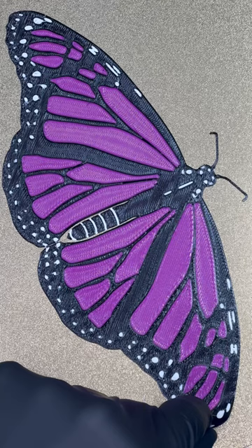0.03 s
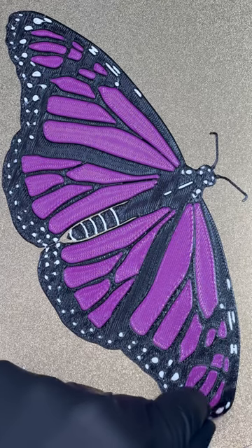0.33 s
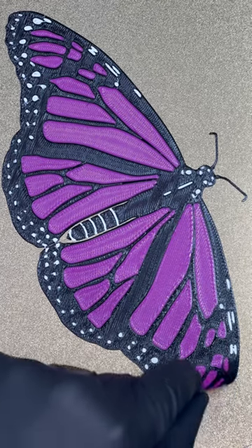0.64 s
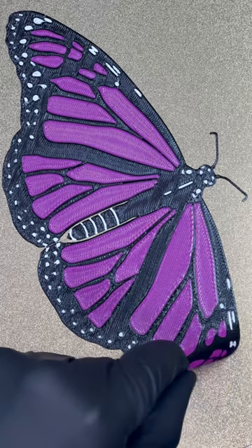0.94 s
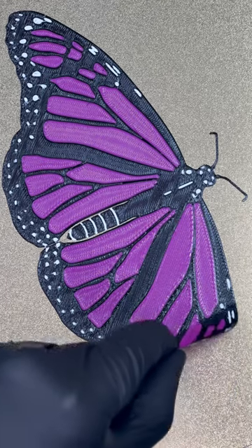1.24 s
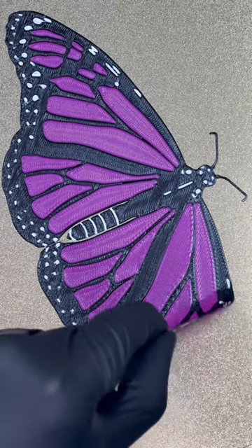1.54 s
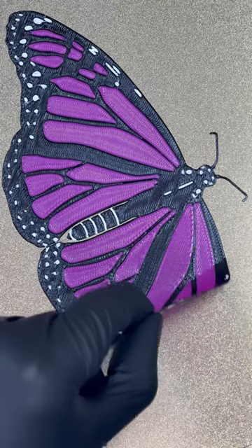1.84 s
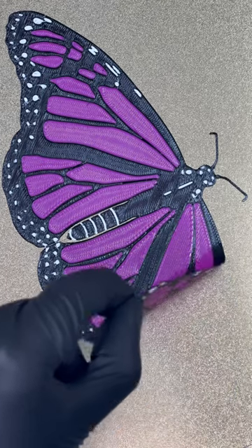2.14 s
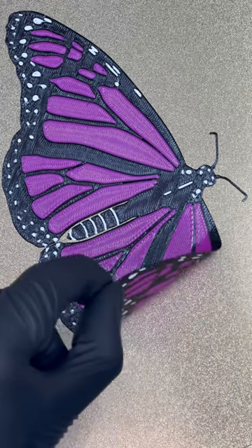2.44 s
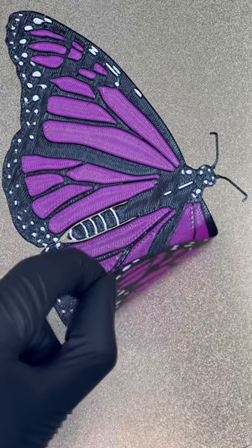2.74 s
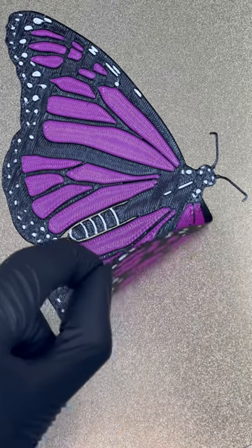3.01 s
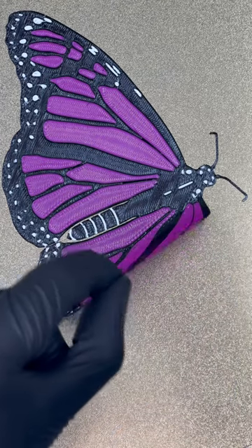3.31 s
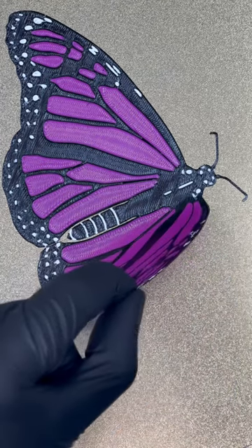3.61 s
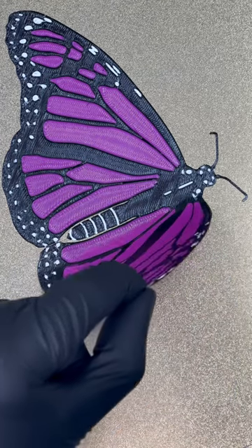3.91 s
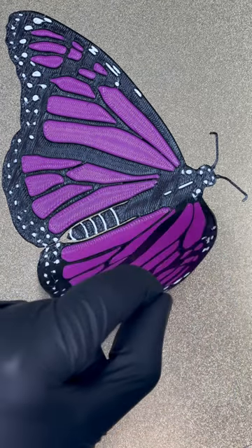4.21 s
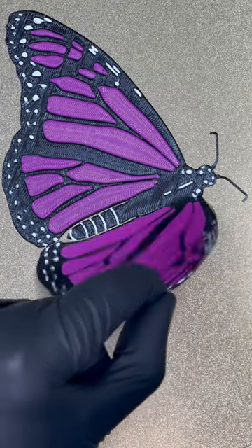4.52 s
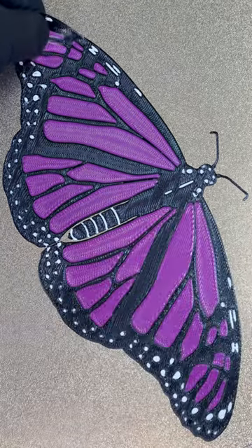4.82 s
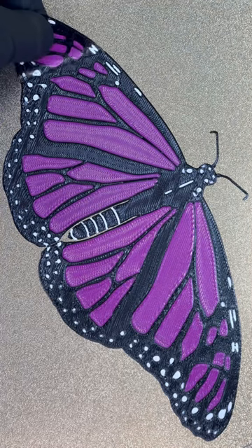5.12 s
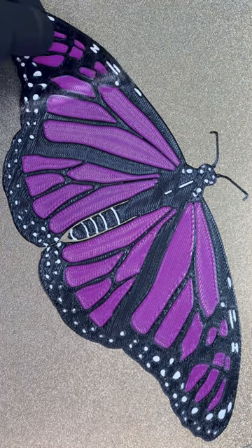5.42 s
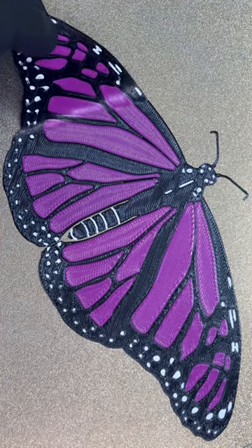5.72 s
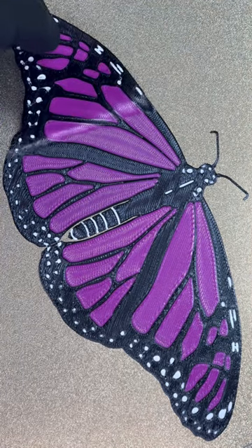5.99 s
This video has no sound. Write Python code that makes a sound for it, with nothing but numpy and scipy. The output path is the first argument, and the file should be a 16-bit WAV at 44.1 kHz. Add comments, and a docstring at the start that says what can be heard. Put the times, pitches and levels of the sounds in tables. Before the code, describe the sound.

Close, crisp crackles and snaps of a thin plastic sheet being peeled from a plate, interrupted by one sharp slap.

```python
"""A faint crackle rises out of a small room's low rumble: a thin plastic print is being peeled off a
textured build plate, close by. The bond fails in avalanches of tiny cracks and single sharp snaps,
with a few dull thumps as the plate gives, and the freed flap rings lower as it grows.
At about 4.5 s the first wing is let go and slaps back on the plate; then a second wing is peeled."""
import sys
import numpy as np
from scipy import signal
from scipy.fft import rfft, irfft, next_fast_len
from scipy.io import wavfile
from scipy.ndimage import uniform_filter1d

SR = 44100
rng = np.random.default_rng(int(sys.argv[2]) if len(sys.argv) > 2 else 0)


def to_wav(s):
    """Save 16-bit WAV."""
    ch = np.atleast_2d(s).T  # columns
    pcm = np.round(np.clip(ch, -1, 1) * 32767)  # PCM
    wavfile.write(sys.argv[1], SR, pcm.astype(np.int16))


N = 271215
TIME = np.arange(N) / SR


def amp(db):
    return 10 ** (np.asarray(db) / 20)


def unit_rms(x):
    return x / np.sqrt(np.mean(x ** 2) + 1e-20)


def curves(rows):
    """Turns each column after the time column into an automation curve, one value per sample."""
    times, *columns = np.transpose(rows)
    return [np.interp(TIME, times, column) for column in columns]


def value_at(points, hz):
    """Reads a curve at hz, on a log-frequency axis."""
    freqs, values = np.transpose(points)
    return np.interp(np.log(hz + 1), np.log(freqs + 1), values)


def add(mix, start_s, sound):
    part = mix[round(start_s * SR):][:len(sound)]
    part += sound[:len(part)]


def coloured(x, eq, size=2048):
    """Unit-energy EQ, causal so that attacks stay sharp."""
    log_gain = np.log(amp(value_at(eq, abs(np.fft.fftfreq(size, 1 / SR)))))
    taps = np.fft.ifft(np.exp(signal.hilbert(log_gain).conj())).real[:size // 2]
    return signal.fftconvolve(x, taps / np.linalg.norm(taps))[:len(x)]


def tinted(x, body_db, treble_db, body_hz=2350, treble_hz=10700):
    """Levels three bands to equal rms, then sets body and treble against the mids."""
    size = next_fast_len(len(x))
    hz, spectrum = np.fft.rfftfreq(size, 1 / SR), rfft(x, size)
    low = 1 / (1 + (hz / body_hz) ** 8)
    high = 1 - 1 / (1 + (hz / treble_hz) ** 12)
    bands = (low, 1 - low - high, high)
    body, mids, treble = (unit_rms(irfft(spectrum * band, size)[:len(x)]) for band in bands)
    return mids + amp(body_db) * body + amp(treble_db) * treble


# Colour of the room's rumble: freq_hz, gain_db
RUMBLE_EQ = [(20, -4.5), (45, 1), (70, 5), (110, 0), (200, -6), (400, -15.5), (1000, -23.5), (3000, -37.5),
             (9000, -47.5), (16000, -46)]
# Mains hum partials: pitch_hz, level_db
HUM_PARTIALS = [(60, -63), (120, -70.5), (180, -77.5)]


def room_tone(rumble_db=-62):
    """A steady bed of low rumble and mains hum."""
    hum = sum(amp(db) * np.sqrt(2) * np.sin(2 * np.pi * (hz * TIME + rng.random()))
              for hz, db in HUM_PARTIALS)
    rumble = unit_rms(coloured(rng.standard_normal(N), RUMBLE_EQ, size=8192))
    return hum + amp(rumble_db) * rumble


# The pull on each wing, riding the crackle: time_s, level_db, slips_per_s
FIRST_WING_PULL = [(.03, -67.5, 41), (.27, -54, 86), (.3, -35, 600), (.47, -42.5, 840), (.65, -35, 1200),
                   (.92, -39.5, 1180), (1.4, -30.5, 670), (1.82, -26, 930), (2.16, -43, 540),
                   (2.45, -31.5, 600), (2.7, -30.5, 1000), (3.04, -21, 1130), (3.25, -43.5, 170),
                   (3.55, -23.5, 445), (3.73, -45.5, 107), (3.98, -29.5, 188), (4.17, -35, 223),
                   (4.29, -65, 180), (4.46, -24, 155)]
SECOND_WING_PULL = [(4.612, -50.5, 130), (4.81, -62, 150), (4.882, -37.5, 297), (5.1, -36, 570),
                    (5.299, -30.5, 1030), (5.5, -36, 550), (5.91, -32.5, 1200), (5.98, -42, 560),
                    (6.141, -60.5, 73)]


def pull():
    """How loud and how busy the peel is, through both wings."""
    return curves(FIRST_WING_PULL + SECOND_WING_PULL)


def fracture(scatter_s, scatter_db, tail_s, tail_db, size=1024):
    """One crack of unit energy: a sharp click, waves scattered in the sheet, and a longer tail."""
    t = np.arange(size) / SR
    scatter, tail = rng.standard_normal((2, size)) * np.exp(-t / np.array([[scatter_s], [tail_s]]))
    wave = amp(scatter_db) * scatter / np.linalg.norm(scatter)
    wave += amp(tail_db) * tail / np.linalg.norm(tail)
    wave[0] += 1
    return wave / np.linalg.norm(wave)


def avalanches(cracks_per_s=4400, burst_s=.0013, creep=.14, first_crack=2.7):
    """Each slip of the peel line sets off a short burst of tiny cracks of very unequal size."""
    def impulses(per_s, spread_db):
        return (rng.random(N) < per_s / SR) * amp(spread_db * np.minimum(rng.exponential(1, N), 3))

    _, slips_per_s = pull()
    slips = impulses(slips_per_s, spread_db=5)
    activity = creep + signal.lfilter([1], [1, -np.exp(-1 / (burst_s * SR))], slips)
    cracks = impulses(cracks_per_s, spread_db=4)
    clicks = (activity * cracks + first_crack * slips) * rng.choice([-1, 1], N)
    # each spot on the peel line sounds its own way
    spots = [fracture(scatter_s=.0003, scatter_db=-4, tail_s=.0025, tail_db=-12) for _ in range(16)]
    spot = rng.integers(0, len(spots), N)
    return sum(signal.oaconvolve(clicks * (spot == k), wave)[:N] for k, wave in enumerate(spots))


def resonate(x, hz, width_hz):
    """A unity-gain resonance, steady or gliding along the curve hz."""
    r = np.exp(-np.pi * width_hz / SR)
    if np.ndim(hz) == 0:
        return 2 * signal.lfilter([1 - r], [1, -r * np.exp(2j * np.pi * hz / SR)], x + 1e-18).real
    turn = np.exp(2j * np.pi * np.cumsum(hz) / SR)
    return 2 * (turn * signal.lfilter([1 - r], [1, -r], x * turn.conj() + 1e-18)).real


# The flap's bending modes: pitch_ratio, width_hz, gain_db
FLAP_MODES = [(1, 75, 11), (2.08, 110, 7), (3.5, 200, 2), (5.6, 320, -3)]
# Each wing's flap as it comes free: time_s, bend_hz, ring_hz, strip_gain_db, low_ring_gain_db
FIRST_WING_FLAP = [(.28, 5070, 7360, -37, 8.5), (.6, 1530, 7600, -8.5, 9.5), (.8, 1030, 6940, -17, 16.5),
                   (1.2, 607, 7000, 2.5, 13), (1.6, 443, 6400, -1, -30), (2, 340, 5030, -2.5, 0.5),
                   (2.6, 300, 5220, -1, -10), (3.05, 264, 4300, -16.5, -20.5), (3.6, 217, 3760, -1.5, -7.5),
                   (4.44, 220, 3720, 5, -21.5)]
SECOND_WING_FLAP = [(4.521, 3550, 6200, -11, -13.5), (4.83, 3320, 5800, -17, -18),
                    (4.97, 1916, 4800, 4, -23), (5.17, 1747, 4700, 3.5, -32),
                    (5.33, 1355, 4650, 9.5, -17.5), (5.55, 775, 4370, 1.5, -9),
                    (5.72, 750, 6000, -6.5, -12), (6.1, 638, 5380, -3, 3)]


def flap(x, ring_db=3.5, upper_db=3.5, bending_db=4, tip_hz=7250):
    """The freed plastic rings at pitches that sink as more of it comes loose."""
    rows = FIRST_WING_FLAP + SECOND_WING_FLAP
    _, ring_hz, strip_db, low_db = curves(rows)
    bend_hz = 1 / curves([(s, 1 / hz) for s, hz, *_ in rows])[0]  # the period grows with freed length
    upper_hz = 9750 * (bend_hz / 1000) ** .25  # the bent strip's upper ring sinks with the bending mode
    strip = amp(ring_db) * resonate(x, ring_hz, width_hz=480)
    strip += amp(upper_db) * resonate(x, upper_hz, width_hz=650)
    low_ring = amp(low_db) * resonate(x, .48 * ring_hz, width_hz=380)
    bending = sum(amp(db) * resonate(x, np.minimum(ratio * bend_hz, SR / 2), width_hz)
                  for ratio, width_hz, db in FLAP_MODES)
    bending /= np.hypot(1, .75 * bend_hz / 1000)  # the fingers damp a short flap
    second_wing = TIME > SECOND_WING_FLAP[0][0]
    tip = resonate(x * second_wing, tip_hz, width_hz=500)  # its tip has a steady ring of its own
    return x + amp(strip_db) * strip + low_ring + tip + amp(bending_db) * bending


# The build plate's resonances: pitch_hz, width_hz, gain_db
PLATE_RINGS = [(380, 20, 1), (890, 39, 0), (1270, 41, -13), (1942, 66, 4.5), (2950, 300, -6)]


def plate(x, free_at_s=1.86):
    """The plate rings at steady pitches, damped by the print until enough has come off."""
    bared = np.clip(TIME / free_at_s, 0, 1) ** 2
    return x + sum(amp(db) * resonate(bared * x, hz, width_hz) for hz, width_hz, db in PLATE_RINGS)


# The peel line sticks and the crackle ducks: start_s, length_s
STALL_CUES = [(1.9, 0.043), (2.075, 0.012), (2.188, 0.028), (2.31, 0.025), (2.406, 0.022), (3.278, 0.014),
              (3.392, .031), (3.691, 0.026), (4.182, 0.027), (4.981, 0.019)]
# A stretch of the bond tears in one go: start_s, length_s, level_db
SURGE_CUES = [(1.156, 0.012, -25), (2.092, 0.035, -28), (2.216, 0.015, -28), (2.269, 0.014, -30),
              (2.346, 0.019, -27.5), (3.32, 0.053, -24.5), (3.537, 0.016, -28), (3.869, 0.016, -23.5),
              (4.487, 0.046, -23.5), (5.159, 0.036, -27.5)]


def stick_and_slip(stall_db=-12.5, run_on_db=-18.5, run_on_decay_s=.0081, fade_s=.0059):
    """The crackle's envelope: the pull, with stalls, surges and a brief run-on after each cued snap."""
    stuck, freed = np.zeros((2, N))
    t = np.arange(SR // 8) / SR
    attack = np.minimum(t / fade_s, 1)
    for start_s, length_s in STALL_CUES:
        add(stuck, start_s, attack * (t < length_s))
    for start_s, db, *_ in SNAP_CUES:
        add(freed, start_s, amp(db + run_on_db) * np.exp(-t / run_on_decay_s))
    for start_s, length_s, db in SURGE_CUES:
        release = np.exp(-np.maximum(t - length_s, 0) / fade_s)
        add(freed, start_s, amp(db) * attack * release)
    pull_db, _ = pull()
    return amp(stall_db * stuck) * np.hypot(amp(pull_db), freed)


# Colour of the tiny cracks: freq_hz, gain_db
CRACK_EQ = [(40, -14), (150, -19.5), (500, -20.5), (1200, -16.5), (2200, -13), (3200, -11), (4500, -5),
            (6500, 0.5), (9500, -2.5), (12000, -12), (16000, -13)]
# Each wing's tone against the mids, before trims: time_s, body_db, treble_db
FIRST_WING_TONE = [(.1, -23, 3.5), (.35, -13, 6), (.8, -13, 10), (1.6, -23.5, 3.5), (2.4, -22.5, 1.5),
                   (3.1, -30.5, 1.5), (4.1, -27.5, 0.5), (4.42, -26.5, 0)]
SECOND_WING_TONE = [(4.52, -24, 3.5), (4.9, -24.5, -1.5), (5.12, -14, -2.5), (5.6, -20, -10.5),
                    (5.9, -24, -6), (6.099, -33, -11)]


def crackle(trim_db=-.76, body_trim_db=1, treble_trim_db=2, grip_depth_db=3.5, grip_s=.011):
    """The failing bond crackles through flap and plate; its grip is uneven from spot to spot."""
    body_db, treble_db = curves(FIRST_WING_TONE + SECOND_WING_TONE)
    grip = uniform_filter1d(rng.standard_normal(N), round(grip_s * SR))
    grip = unit_rms(uniform_filter1d(grip, size=400))
    ringing = plate(flap(coloured(avalanches(), CRACK_EQ)))
    sound = tinted(ringing, body_db + body_trim_db, treble_db + treble_trim_db)
    power = uniform_filter1d(uniform_filter1d(sound ** 2, size=900), size=900)
    levelled = sound / np.sqrt(abs(power) + 1e-6)  # a steady pull frees energy at a steady rate
    return amp(trim_db + grip_depth_db * np.tanh(grip)) * stick_and_slip() * levelled


# Larger patches letting go, before trims, tone against the mids: start_s, level_db, body_db, treble_db
SNAP_CUES = [(0.2258, -16.5, -21.5, -2.5), (0.2835, -7, -20, -14.5), (0.8846, -13.5, -31, -8.5),
             (1.0302, -18, -23, -12), (1.2648, -3, -31, -0.5), (1.3438, -10, -44, -4),
             (1.3936, -14, -33, -24), (1.494, -6, -42, -7.5), (1.6327, -4, -36, -15.5),
             (1.6802, -11, -54, -8), (1.71, -8, -52, -13), (1.7486, -2.5, -54, -10.5),
             (1.9451, -0.5, -41, -20), (1.9935, -6, -42, -10), (2.0375, -6, -39, -8.5),
             (2.2188, -4, -47, -22), (2.3506, -8.5, -36, -19), (2.4869, -8, -29.5, -10.5),
             (2.643, -5, -40, -43), (2.6866, -2, -50, -8), (2.7302, -5, -47, -2), (2.7731, -3.5, -45, -20),
             (3.051, -4, -49, -17), (3.0747, 5.5, -34, -9), (3.1872, -9, -57, -16),
             (3.3039, -0.5, -29.5, -11), (3.3192, 6, -48, -11), (3.3453, -2.5, -34.5, -32),
             (3.3549, -1, -58, -23), (3.3892, -13, -46, -4), (3.4257, -1.5, -39.5, -15.5),
             (3.4625, -2, -23.5, -3), (3.508, -0.5, -49.5, -8), (3.5582, 1.5, -33, -5),
             (3.717, -17, -49, -15), (3.7277, -14, -46, -21), (3.7448, -2, -43, -37),
             (3.8563, 1, -37.5, -30.5), (3.8838, -6.5, -31, -14), (4.0022, -14, -56, -26),
             (4.0798, -7.5, -53, -31), (4.117, -7, -52, -8), (4.1595, -0.5, -57, -5.5),
             (4.2042, -15, -36.5, -17), (4.339, -21, -50, -6), (4.423, -7, -44, -40), (4.555, -7.5, -42, 6),
             (4.6672, -22, -41.5, -35), (4.7117, -23.5, -40, -32), (4.782, -26, -41, -33),
             (4.8489, -21, -51, -36), (4.9656, -20.5, -48, -17), (5.1307, -26, -31, -23),
             (5.2174, -4, -42, 6), (5.5136, -9, -41, -41), (5.672, -7.5, -30.5, -11),
             (5.7597, -13, -31.5, -29), (5.9065, -14, -32, -36), (6.0182, -17, -30.5, -34.5)]
# Colour of a snap: freq_hz, gain_db
SNAP_EQ = [(40, -19), (200, -32.5), (700, -32.5), (1800, -28), (3000, -12), (4500, -4), (7500, 6.5),
           (10500, 5), (16000, -3.5)]


def snaps(trim_db=3.5, body_trim_db=12, treble_trim_db=14):
    """Single sharp cracks, each with its own colour, rung through flap and plate."""
    out = np.zeros(N)
    for start_s, db, body_db, treble_db in list(SNAP_CUES) + small_snap_cues():
        crack = coloured(fracture(scatter_s=.00071, scatter_db=0, tail_s=.0017, tail_db=-2), SNAP_EQ)
        sound = tinted(np.pad(crack, 32), body_db + body_trim_db, treble_db + treble_trim_db)
        add(out, start_s, amp(db + trim_db) * sound / np.linalg.norm(sound))
    return plate(flap(out, ring_db=10, upper_db=-19.5))


def small_snap_cues(count=64, trim_db=4, follow=.52, spread_db=2, body_trim_db=-13, treble_trim_db=-14):
    """Lesser patches let go at chance moments, louder under a harder pull, never during a stall."""
    first_s, last_s = FIRST_WING_PULL[2][0], SECOND_WING_PULL[-2][0]
    pull_db, _ = pull()
    body_db, treble_db = curves(FIRST_WING_TONE + SECOND_WING_TONE)
    jitter, size = rng.random((count, 2)).T
    start_s = first_s + (last_s - first_s) * (np.arange(count) + jitter) / count
    at = (start_s * SR).astype(int)
    level_db = trim_db + follow * pull_db[at] + spread_db * (2 * size - 1)
    cues = zip(start_s, level_db, body_db[at] + body_trim_db, treble_db[at] + treble_trim_db)
    return [cue for cue in cues
            if not any(0 < cue[0] - stall_s < length_s for stall_s, length_s in STALL_CUES)]


# The plate gives as the pull suddenly lets go: start_s, level_db, decay_s
THUMP_CUES = [(0.2814, -40.5, 0.01), (3.066, -48, 0.013), (3.86, -40, 0.02), (4.472, -31, 0.027),
              (5.67, -46, 0.011), (5.757, -47.5, 0.017)]
# Colour of a thump: freq_hz, gain_db
THUMP_EQ = [(25, -14), (55, -3), (110, 0), (185, 0), (270, -11), (500, -24), (2000, -50)]


def thumps():
    """Dull, quickly damped shakes of the plate on the table."""
    out, t = np.zeros(N), np.arange(SR // 4) / SR
    for start_s, db, decay_s in THUMP_CUES:
        shake = rng.standard_normal(len(t)) * np.exp(-t / decay_s)
        add(out, start_s, amp(db) * coloured(shake, THUMP_EQ))
    return out


# The released wing landing piece by piece: start_s, gain_db, decay_s
SLAP_CUES = [(4.4639, 0, .001), (4.4676, -4, .0011), (4.4687, -3, .0015), (4.4727, -8, .001),
             (4.474, -3, .0013), (4.4854, -7, .0008)]
# Colours of the bright smack and of the thud under it: freq_hz, gain_db
SMACK_EQ = [(40, -33), (150, -54), (350, 2), (600, -16), (1300, -14), (2500, -0.5), (5500, 4), (10500, 6.5),
            (16000, -10.5)]
THUD_EQ = [(30, -26), (80, -19), (175, -3.5), (250, -9), (365, -3), (520, -6.5), (900, -2.5), (1400, -8.5),
           (2000, -4.5), (4000, -16), (10000, -24)]


def slap(smack_db=2.5, thud_db=-28, thud_decay_s=.016, knock_hz=182.5, knock_db=-30.5):
    """The wing whips down in a few quick blows that thud through the plate and sound its low note."""
    out, t = np.zeros(N), np.arange(SR // 5) / SR
    for start_s, db, decay_s in SLAP_CUES:
        crack, push = rng.standard_normal((2, len(t)))
        smack = amp(smack_db) * coloured(crack * np.exp(-t / decay_s), SMACK_EQ)
        thud = amp(thud_db) * coloured(push * np.exp(-t / thud_decay_s), THUD_EQ)
        add(out, start_s, amp(db) * (smack + thud))
    knock = np.exp(-t / .027) * np.sin(2 * np.pi * knock_hz * t)
    add(out, SLAP_CUES[1][0], amp(knock_db) * knock)
    return out


# The small room's decay: freq_hz, t60_s
ROOM_DECAY = [(100, 0.18), (1000, 0.38), (5000, 0.11), (16000, 0.15)]


def room(x, early_db=-14, early_decay_s=.004, tail_db=-25, echoes_per_s=2500):
    """Quick reflections from hand and table, then a faint short room tail."""
    t = np.arange(SR // 3) / SR
    signs = rng.choice([-1., 1.], (2, len(t)))
    early, tail = signs * (rng.random((2, len(t))) < echoes_per_s / SR) * (t > .001)
    early *= np.exp(-t / early_decay_s)
    hz, frame_s, frames = signal.stft(tail, SR, nperseg=256)
    fade = amp(-60 * frame_s / value_at(ROOM_DECAY, hz)[:, None])
    tail = signal.istft(frames * fade, SR, nperseg=256)[1][:len(t)]
    echo = amp(early_db) * early / np.linalg.norm(early) + amp(tail_db) * tail / np.linalg.norm(tail)
    return x + signal.fftconvolve(x, echo)[:N]


def scene():
    """The peel and the slap in the room, over its quiet bed, in mono."""
    action = crackle() + snaps() + slap() + thumps()
    return (room(action) + room_tone())[None]


def record(dry, cutoff_hz=16150):
    """The loudest peaks clip, then a steep low-pass takes off the very top."""
    lowpass = signal.firwin(401, cutoff_hz, window=("kaiser", 8), fs=SR)
    return signal.oaconvolve(np.clip(dry, -1, 1), lowpass[None], "same")


dry = scene()
out = record(dry)
to_wav(out)
```